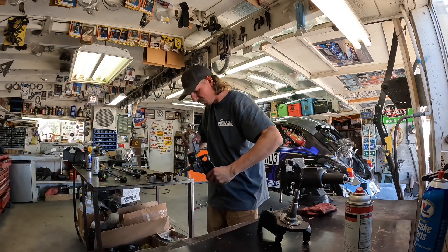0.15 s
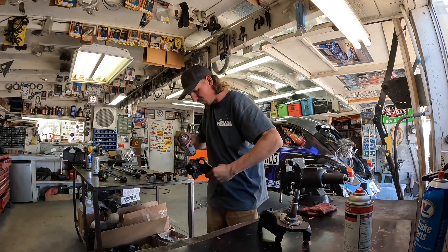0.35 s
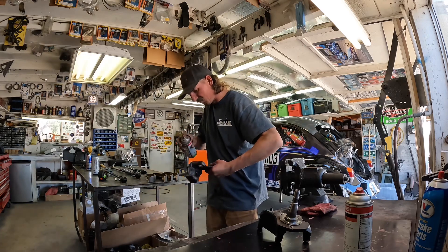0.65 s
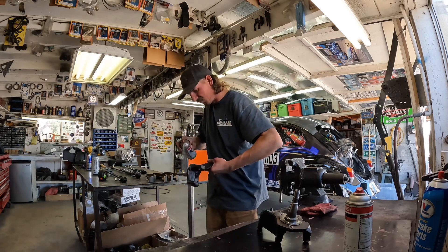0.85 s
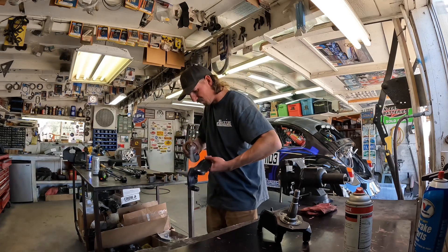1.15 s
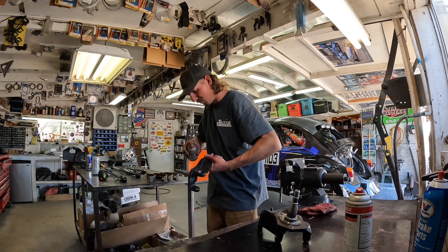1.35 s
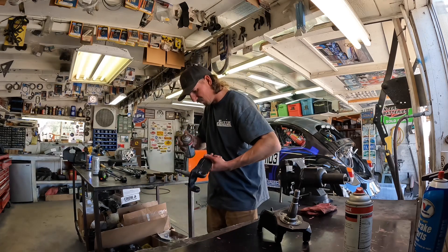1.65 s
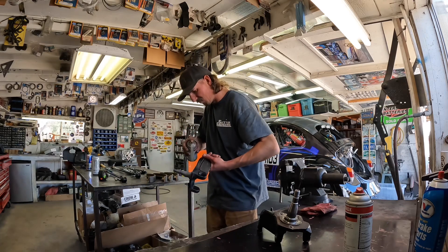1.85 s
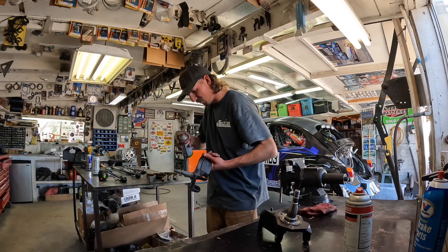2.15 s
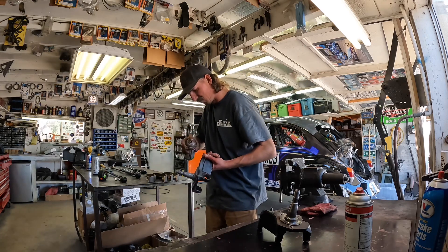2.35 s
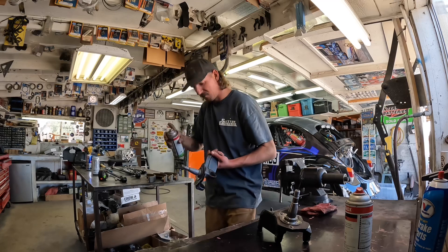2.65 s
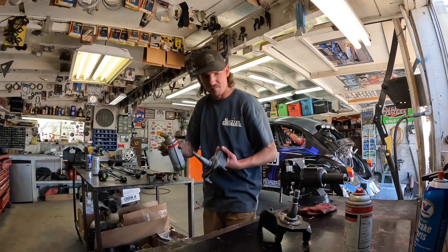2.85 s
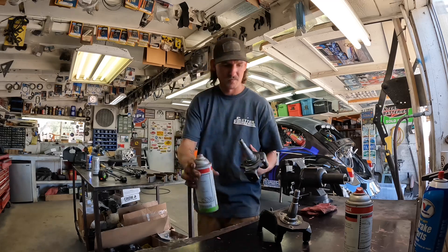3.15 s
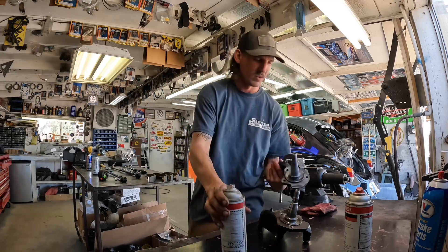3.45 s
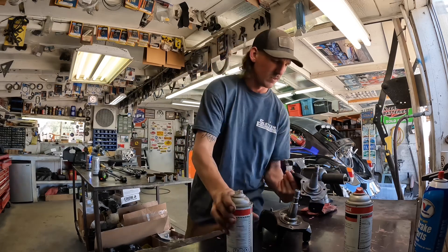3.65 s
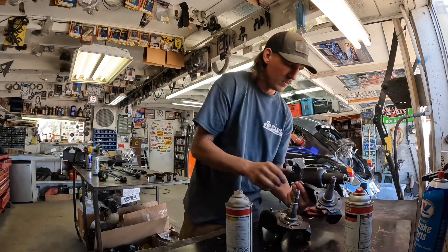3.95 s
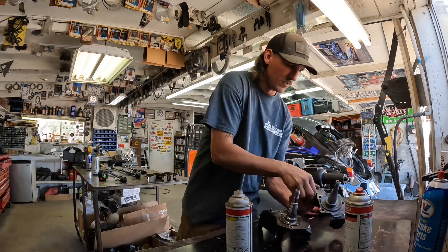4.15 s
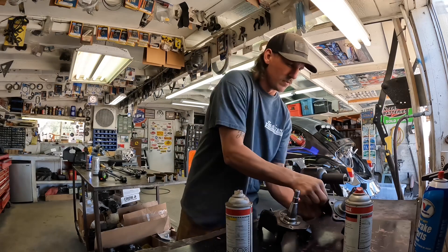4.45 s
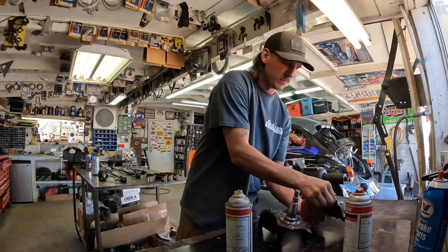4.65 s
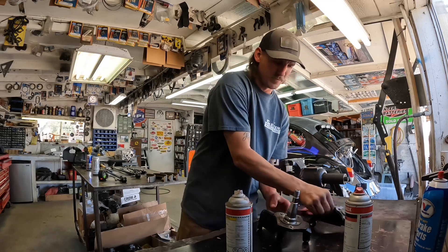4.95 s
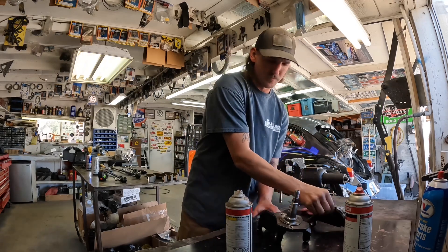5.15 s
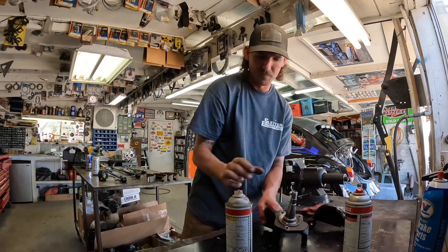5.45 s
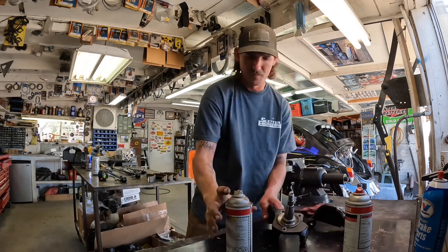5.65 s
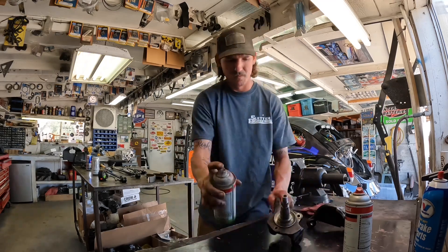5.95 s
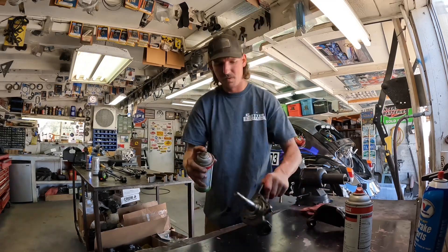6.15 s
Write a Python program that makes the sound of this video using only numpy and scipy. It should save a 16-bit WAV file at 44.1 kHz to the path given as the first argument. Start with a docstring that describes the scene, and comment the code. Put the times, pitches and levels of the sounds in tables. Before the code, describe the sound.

A spray can spurts in brief bursts, pauses with cloth rustle, then cans and steel parts thud and drag across a resonant metal bench.

```python
"""Over the hum of a garage, an aerosol can hisses in short bursts on a metal part, which drips.
The can and steel parts are then knocked down and dragged on the steel bench that carries the microphone.
Hiss, clang and thud are shaped noise; plinks, bench modes, boom, sway and hum are sines.
Cloth rustles at times; a diffuse room tail follows the spray, drips, ticks, knocks and drags."""
import sys
import numpy as np
from scipy import signal
from scipy.fft import rfft, irfft, next_fast_len
from scipy.io import wavfile
from scipy.ndimage import uniform_filter1d

SR = 44100
rng = np.random.default_rng(int(sys.argv[2]) if len(sys.argv) > 2 else 0)


def file_out(sig):
    """Save sig as 16-bit WAV at sys.argv[1]."""
    # one column per channel
    cols = np.atleast_2d(sig).T
    # limit, then scale
    lim = np.clip(cols, -1, 1)
    pcm = np.round(lim * 32767).astype(np.int16)
    wavfile.write(sys.argv[1], SR, pcm)


N = 278271
T = np.arange(N) / SR

# Table levels are relative: layer gains and the port balance come on top.
# aerosol jet spectrum: freq_hz, density_db
JET = [(470, -24), (800, -22.5), (928, -27.5), (1350, -11), (1700, -12.5), (2270, -6.5), (3200, -8.5),
       (4420, -6), (5200, -8.5), (5670, -3.5), (7350, -5), (8640, -9), (11900, -9), (14200, -16.5),
       (15500, -34)]
# scrape and click spectrum of metal on metal: freq_hz, density_db
GRIT = [(800, -4.5), (1400, 9.5), (1750, 9), (2050, 6), (2500, 7), (3500, 3), (4500, -7.5), (7000, -18.5),
        (9000, -35), (14000, -61.5)]
# low spectrum of the struck or juddering bench: freq_hz, density_db
THUD = [(40, -15.5), (65, 3.5), (90, -17), (125, 0), (185, 0), (235, -2), (300, -11.5), (450, -17),
        (900, -73)]
# bench sound at the two ports: freq_hz, left_minus_right_db
BENCH_SIDE = [(30, -5), (130, 0), (600, 1.3), (1200, 1.4), (2500, -2.4), (5000, 0), (12000, 2)]
# source straight ahead: freq_hz, left_minus_right_db
CENTRE = [(20, 0), (16000, 0)]


def amp(db):
    """Decibels to gain."""
    return 10 ** (np.asarray(db) / 20)


def evened(x):
    """Scales to rms 1."""
    return x / np.sqrt(np.mean(x ** 2) + 1e-20)


def read(points, hz):
    """Interpolates a table on a log-frequency axis."""
    f, value = np.transpose(points)
    return np.interp(np.log(hz + 1), np.log(f + 1), value)


def level(s, db):
    """Smoothed gain curve through the points, practically silent outside them."""
    return uniform_filter1d(amp(np.interp(T, s, db, left=-150, right=-150)), 100)


def add(mix, s, sound):
    """Adds a multichannel sound at time s."""
    part = mix[:, max(round(s * SR), 0):][:, :sound.shape[1]]
    part += sound[:, :part.shape[1]]


def colour(x, db_at):
    """Filters by a gain in dB given as a function of frequency."""
    size = x.shape[-1]
    return irfft(rfft(x) * amp(db_at(np.fft.rfftfreq(size, 1 / SR))), size)


def drift(rate_hz):
    """Random curve: straight lines between Gaussian knots of unit variance, rate_hz knots a second."""
    knots = rng.standard_normal(400)
    return np.interp(T * rate_hz, np.arange(len(knots)), knots)


def resonance_db(hz, centre_hz, half_width_hz):
    """Gain of a narrow band, 6 dB down at half_width_hz from its centre."""
    return -20 * np.log10(1 + ((hz - centre_hz) / half_width_hz) ** 2)


def noise(db_at, side, size=N):
    """Coloured noise of rms 1 at two close ports: a shared part plus an opposed part."""
    # likeness of the two ports: freq_hz, correlation
    likeness = [(30, .96), (70, .96), (130, .99), (260, .98), (600, .94), (1200, .88), (2500, .84),
                (5000, .86), (9000, .84), (13000, .42)]
    padded = next_fast_len(size)
    hz = np.fft.rfftfreq(padded, 1 / SR)
    a, b = np.exp(2j * np.pi * rng.random((2, len(hz))))
    same = np.clip(read(likeness, hz), 0, 1)
    lean = amp(read(side, hz) / 2)
    mid, wide = a * np.sqrt(1 + same), b * np.sqrt(1 - same)
    ports = np.array([(mid + wide) * lean, (mid - wide) / lean])
    return evened(irfft(ports * amp(db_at(hz)), padded)[:, :size])


def onset(t):
    """A contact builds its force within about half a millisecond."""
    return 1 - np.exp(-(t / .0004) ** 2)


def gate_db(t, length, rise_db_per_s, fall_db_per_s):
    """Attack, hold and release in dB; the hold runs from t = 0 to length."""
    return rise_db_per_s * np.minimum(t, 0) - fall_db_per_s * np.maximum(t - length, 0)


def spray(flutter_db=1.24, ripple_db=1.5):
    """Sputtering jet hiss, narrower at a light press; an echo off the part combs each press differently."""
    # nozzle presses, light ones only leak: start_s, length_s, hiss_db
    presses = [(0, 0.013, -37), (0.185, 0.12, -40.5), (0.469, 0.13, -40), (0.773, 0.14, -40.5),
               (1.105, 0.12, -39), (1.439, 0.13, -64), (1.474, 0.0072, -56), (1.529, 0.023, -45),
               (1.681, 0.027, -57.5), (1.705, .008, -53), (1.843, 0.034, -61.5), (1.888, 0.14, -39),
               (2.424, 0.11, -39.5)]
    # resonances of nozzle and wetted part: freq_hz, width_hz (Gaussian, 2 sigma), gain_db
    resonances = [(2000, 360, 1.5), (4700, 620, 5), (5600, 420, 3.5), (7500, 1100, 6), (8350, 930, -5),
                  (11300, 1900, 3.5)]
    valve_open_db_per_s, valve_shut_db_per_s = 2000, 804
    build_db, build_s = 4.5, 0.014  # the jet starts this much weaker and builds up
    full_jet_db, leak_hz = -36, 4440
    narrowing_db_per_octave = 0.25  # for each dB below the full jet
    size = 16384
    out = np.zeros((2, N))
    for s, length, db in presses:
        start = max(s - .03, 0)
        t = start + T[:size] - s
        echo_s = rng.uniform(0.000728, 0.0022)
        narrowing = narrowing_db_per_octave * max(full_jet_db - db, 0)

        def shape(hz):
            peaks = sum(g * np.exp(-2 * ((hz - f) / w) ** 2) for f, w, g in resonances)
            comb = ripple_db * np.cos(2 * np.pi * hz * echo_s)
            return read(JET, hz) + peaks + comb - narrowing * abs(np.log2((hz + 1) / leak_hz))

        valve = gate_db(t, length, valve_open_db_per_s, valve_shut_db_per_s)
        build = -build_db * np.exp(-np.maximum(t, 0) / build_s)
        add(out, start, noise(shape, SPRAY_SIDE_OF(), size=size) * amp(db + valve + build))
    return out * amp(flutter_db * drift(60))


def SPRAY_SIDE_OF():
    """The jet's balance between the ports varies with frequency."""
    # spray at the two ports: freq_hz, left_minus_right_db
    jet_side = [(1000, 4.5), (2500, -1), (6000, 1.5), (9000, 2), (13000, 4)]
    return jet_side


def drips(gain_db=-1, t60_s=0.033, splash_db=-11, splash_t60_s=0.022, glide_per_s=4):
    """Each drop is a short sine plink sliding up in pitch, with a little noise splash."""
    # drops: start_s, level_db, start_pitch_hz
    drops = [(1.308, -49, 1490), (1.359, -48, 1440), (1.768, -45.5, 1420), (2.174, -46.5, 1340),
             (4.107, -45.5, 1340), (4.2275, -48, 1306), (4.3035, -47.5, 1270), (4.361, -50, 1310)]
    out, t = np.zeros((2, N)), T[:6000]
    for s, db, hz in drops:
        plink = np.sin(2 * np.pi * hz * (t + glide_per_s * t ** 2 / 2)) * amp(-60 * t / t60_s)
        splash = noise(lambda f: read(JET, f) - f / 900, CENTRE, size=6000)
        splash = splash * amp(splash_db - 60 * t / splash_t60_s)
        add(out, s, amp(db + gain_db) * (plink + splash) * onset(t))
    return out


def ticks(click_t60_s=.045):
    """Small touches of metal on metal: a dry click and one resonance."""
    # touches: start_s, level_db, pitch_hz, t60_s, ring_over_click_db
    touches = [(3.457, -54.5, 3050, 0.082, 5.5), (3.464, -53, 1390, 0.041, 3.5),
               (3.838, -45, 4600, .015, -4), (5.728, -51, 5200, 0.0091, 4), (5.99, -50.5, 1740, 0.5, 4),
               (6.177, -55.5, 2320, .1, -1)]
    out, t = np.zeros((2, N)), T[:8000]
    for s, db, hz, t60, ring_db in touches:
        click = noise(lambda f: read(GRIT, f), CENTRE, size=8000) * amp(-60 * t / click_t60_s)
        ring = np.sin(2 * np.pi * hz * t) * amp(ring_db - 60 * t / t60)
        add(out, s, amp(db) * (click + ring) * onset(t))
    return out


def bench_ring(damped=False):
    """Decaying modes of the bench top, weighted a little differently at each contact."""
    # bench modes: freq_hz, level_db, t60_s (undamped)
    modes = [(292, -5.5, .25), (437.6, -11.5, 0.2), (527, 3.5, 0.24), (558.7, 8, 0.17), (735.3, -6.5, 0.43),
             (728, -6.5, 0.74), (870, -7.5, 0.7), (910, -2, 0.22), (989, 0, 0.36), (1091, 4, 0.15),
             (1437, 1, 0.076), (1544, 3.5, .2), (1695, -4, 0.13), (2265, -2, 0.1), (2250, -8, 0.23),
             (2424, 17, 0.031), (2580, 4, 0.14), (3007, 2.5, 0.14), (3400, 1, 0.14), (3800, -4.5, 0.061),
             (4240, -15, .2), (4300, -7, 0.17), (4870, -11.5, .2), (4930, -11, 0.22), (5570, -6.5, .2),
             (6550, -11.5, 0.2)]
    damped_t60_s, weight_spread_db = .38, 1.8
    t, out = T[:SR], np.zeros((2, SR))
    for hz, db, t60 in modes:
        weight, spread = rng.standard_normal(2)
        port_phase = .3 * min(hz / 1800, 1) * spread * np.array([[1], [-1]])
        phase = 2 * np.pi * rng.random() + port_phase
        lean = amp(read(BENCH_SIDE, hz) * np.array([[.5], [-.5]]))
        decay_s = min(t60, damped_t60_s) if damped else t60
        fade = amp(db + weight_spread_db * weight - 60 * t / decay_s)
        out += lean * fade * np.sin(2 * np.pi * hz * t + phase)
    return out * onset(t) / np.sqrt(np.mean(out[:, :1000] ** 2))


def knocks(ring_db=-2, thud_t60_s=0.27, low_rise_s=0.0025, crack_db=-1, crack_s=0.033):
    """A crack, a clang of dense modes, the ring of the top, a low thud and the boom of the whole sheet."""
    # blows: start_s, clang_db, thud_db, boom_db, brightness_db_per_octave, clang_t60_s, thud_pitch_factor
    blows = [ (3.573, -18, -11, -27, 2, 0.21, 0.99), (3.586, -23, -18, -49.5, -9.5, 0.43, 1.02),
             (3.696, -51.5, -28, -62, 10, 0.18, 1.03), (4.446, -24.5, -8.5, -53, 2, 0.21, 1.065),
             (4.457, -17.5, -12, -51, -3, 0.28, 1.02), (4.595, -48, -16.5, -54, -7, 0.14, 0.82),
             (4.650, -29.5, -16, -54, -5, 0.33, 0.9), (4.792, -52.5, -29.5, -63, -9, 0.062, 1.1),
             (4.9832, -17, -10, -50, -1.5, 0.25, 1.04), (5.088, -20, -12.5, -48.5, 0.5, 0.26, 0.93),
             (5.105, -23.5, -28.5, -54, -7, 0.25, 3), (5.788, -19.5, -24.5, -48, -3.2, 0.13, 1.97),
             (5.953, -33, -23, -71, -4, 0.3, 1.62), (5.965, -44, -28.5, -68, 4.5, 0.41, 0.88),
             (5.992, -44, -50, -60, -1, 0.086, 1), ]
    # dense upper modes: freq_hz, density_db
    dense_modes = [(180, -87), (300, -19), (372, -19.5), (534, -17), (651, -6), (743, -5.5), (862, -11.5),
                   (1100, -6.5), (1930, -6), (2440, -5.5), (4200, -10.5), (4710, -14.5), (10600, -41),
                   (14000, -51.5), (15500, -88.5)]
    # a hand leans on the bench and damps its top: from_s, to_s
    leaning = (4.4, 5.7)
    boom_hz, boom_t60_s = 117, 1.89
    cluster_hz, cluster_db = 90, 3.2
    out, t = np.zeros((2, N)), T[:SR]
    for s, clang_db, thud_db, boom_db, bright_db, t60, pitch in blows:
        clusters = rng.standard_normal(200)  # upper modes bunch unevenly

        def shape(hz):
            bunching = np.interp(hz / cluster_hz, np.arange(200), clusters) * np.clip(hz / 3000, .3, 1)
            tilt = bright_db * np.log2((hz + 200) / 2000)
            return read(dense_modes, hz) + tilt + cluster_db * bunching

        fade = amp(-60 * t / t60) * (1 + amp(crack_db) * np.exp(-t / crack_s))
        clang = noise(shape, BENCH_SIDE, size=SR) * fade
        ring = amp(ring_db) * bench_ring(leaning[0] < s < leaning[1])
        thud = noise(lambda hz: read(THUD, hz / pitch), BENCH_SIDE, size=SR) * amp(-60 * t / thud_t60_s)
        thud = thud / np.sqrt(np.mean(thud[:, :2200] ** 2)) * amp(-8.5)
        boom = np.sin(2 * np.pi * boom_hz * t) * amp(-60 * t / boom_t60_s)
        low = (amp(thud_db) * thud + amp(boom_db) * boom) * (1 - np.exp(-t / low_rise_s))
        add(out, s, (amp(clang_db - 3.5) * (clang + ring) + low) * onset(t))
    return out


def strokes():
    """Gain curves of rub, grit, judder and groan: each stroke grips, grows or fades evenly, and lets go."""
    # dragged metal: start_s, length_s, rub_db, grit_db, judder_db, groan_db, change_along_stroke_db
    pulls = [ (3.652, 0.053, -35.5, -41, -39.5, -60, 8), (4.513, .11, -36, -42.5, -31.5, -54, -3.5),
             (4.649, 0.15, -41.5, -51.5, -36, -59, 1), (5.332, 0.037, -45.5, -49, -61.5, -68, 2),
             (5.45, 0.053, -45.5, -48.5, -58, -54, -1), (5.524, 0.082, -50, -57.5, -49.5, -58, -3.5),
             (5.751, 0.029, -48.5, -45.5, -48, -57, 12), (5.818, 0.13, -39.5, -47, -43, -56, -4),
             (5.947, 0.029, -37, -31, -57, -27.5, -0.5), ]
    grip_db_per_s, let_go_db_per_s = 646.5, 423.5
    out = np.zeros((4, N))
    t = T[:SR // 2] - .1
    for s, length, rub_db, grit_db, judder_db, groan_db, change_db in pulls:
        force_db = gate_db(t, length, grip_db_per_s, let_go_db_per_s)
        force_db = force_db + change_db * (np.clip(t / length, 0, 1) - .5)
        add(out, s + t[0], np.outer(amp([rub_db, grit_db, judder_db, groan_db]), amp(force_db)))
    return out


def drags(rub_db=1, grit_db=0, judder_db=-1, groan_db=-1, ring_share=0.29, uneven_db=0.5):
    """Stick and slip: uneven tiny blows excite the bench under each stroke, and one low resonance groans."""
    # rubbing spectrum: freq_hz, density_db
    rub = [(220, -10), (350, 1), (430, 0), (525, 6), (610, 0), (720, 5), (830, -2.5), (950, 0),
           (1200, -10.5), (1800, -39), (3000, -59)]
    slips_per_s, slip_spread_db, contact_s = 330, 2.5, 0.022
    groan_hz, groan_half_width_hz = 524, 35  # a sliding part chatters on this resonance
    slip_size = amp(slip_spread_db * np.minimum(rng.exponential(1, N), 3))
    slips = (rng.random(N) < slips_per_s / SR) * slip_size * rng.choice([-1, 1], N)
    contact = noise(lambda hz: 0 * hz, BENCH_SIDE, size=2048) * np.exp(-T[:2048] / contact_s)

    def excite(body):
        return evened(signal.oaconvolve(slips[None], body, axes=1)[:, :N])

    dull, ringing = excite(contact), excite(bench_ring(damped=True))

    def tinted(x, points):
        padded = np.pad(x, ((0, 0), (0, next_fast_len(N) - N)))
        return evened(colour(padded, lambda hz: read(points, hz))[:, :N])

    def voice(points, share):
        return np.sqrt(1 - share) * tinted(dull, points) + np.sqrt(share) * tinted(ringing, points)

    groan = noise(lambda hz: resonance_db(hz, groan_hz, groan_half_width_hz), BENCH_SIDE)
    layers = [amp(rub_db) * voice(rub, ring_share), amp(grit_db) * voice(GRIT, ring_share / 4),
              amp(judder_db) * voice(THUD, 0), amp(groan_db) * groan]
    dragged = sum(layer * gain for layer, gain in zip(layers, strokes()))
    return dragged * amp(uneven_db * drift(50))


def sway():
    """Each shove rocks the bench on its legs and shakes the microphone: a wandering low sine."""
    # pushes and blows: start_s, length_s, sway_db
    shoves = [(3.588, 0.12, -21), (3.9, 0.049, -34), (4.456, 0.13, -21.5), (4.682, 0.045, -27.5),
              (4.76, 0.28, -33.5), (5.012, 0.097, -24.5), (5.129, 0.078, -24), (5.388, 0.11, -36.5),
              (5.795, 0.11, -21.5), (5.98, 0.29, -32.5)]
    sway_hz, rise_s, sag_db_per_s = 34.4, 0.016, 13.5
    release_db_per_s = 60 / 0.47  # on top of the sag, once the shove ends
    power = np.zeros(N)
    for s, length, db in shoves:
        t = np.maximum(T - s, 0)
        fade_db = sag_db_per_s * t + release_db_per_s * np.maximum(t - length, 0)
        power += (amp(db - fade_db) * (1 - np.exp(-t / rise_s))) ** 2
    turns = np.cumsum(sway_hz * (1 + .04 * drift(7))) / SR
    return np.sqrt(2 * power) * np.sin(2 * np.pi * turns) * amp([[-3], [2.2]])  # left, right dB


def rustle(brush_db=-2, swish_db=-1, flicker_db=1):
    """Soft, uneven brushing of cloth over a duller swish, both shaped noise."""
    # a shirt brushes: centre_s, half_length_s (to 1/e), level_db
    brushes = [(2.827, 0.04, -69.5), (2.915, .035, -61.5), (3.218, 0.032, -67.5), (3.3, 0.6, -69.5),
               (6.207, 0.15, -66)]
    # cloth spectrum: freq_hz, density_db
    cloth_tint = [(1200, -30), (2600, -6), (4300, 0), (7500, -6), (10000, -17), (14000, -30)]
    # swish level: time_s, level_db
    swish_level = [(2.62, -69.5), (2.942, -58), (3.048, -64.5), (3.258, -65), (3.288, -62), (3.44, -67)]
    # swish spectrum, midrange: freq_hz, density_db
    swish_tint = [(500, -24), (850, -19), (1090, -3), (1400, -6.5), (1860, -1), (2400, -6.5), (3300, -21.5),
                  (6000, -19)]
    brushing = sum(amp(db) * np.exp(-((T - s) / width) ** 2) for s, width, db in brushes)
    cloth = noise(lambda hz: read(cloth_tint, hz), CENTRE) * brushing * amp(brush_db)
    swish = noise(lambda hz: read(swish_tint, hz), CENTRE) * level(*np.transpose(swish_level))
    return (cloth + swish * amp(swish_db)) * amp(flicker_db * drift(25))


def floor(rumble_db=-48.5, fan_db=-78.5, air_db=-69.5, waver_db=1):
    """Wavering hum lines over fan rumble, a narrow band of fan noise and faint hiss."""
    # mains and fan lines: freq_hz, level_db
    lines = [(61.5, -53.5), (120, -62), (135, -57.5), (239.7, -56), (274, -74), (360, -75.5)]
    # rumble spectrum: freq_hz, density_db
    rumble_tint = [(12, -22), (22, 1), (45, 3.5), (75, -3), (100, 1), (145, -2.5), (195, -12), (235, -9),
                   (300, -17.5), (400, -25.5), (465, -32.5), (525, -30), (620, -32), (730, -45),
                   (1100, -43.5), (2500, -92)]
    # hiss spectrum: freq_hz, density_db
    air_tint = [(410, -32.5), (700, -7), (1020, -13), (1180, -9.5), (1370, -5), (1950, -9.5), (3770, -14.5),
                (4850, -6), (5600, -12), (7020, -9), (9330, -17.5), (10600, -8), (15500, -24)]
    fan_hz, fan_half_width_hz = 511.7, 22
    hum = np.zeros(N)
    for hz, db in lines:
        phase = 2 * np.pi * (hz * T + rng.random()) + .2 * drift(1.5)
        hum += amp(db + waver_db * drift(1)) * np.sqrt(2) * np.sin(phase)
    rumble = amp(rumble_db) * noise(lambda hz: read(rumble_tint, hz), CENTRE)
    fan = amp(fan_db) * noise(lambda hz: resonance_db(hz, fan_hz, fan_half_width_hz), CENTRE)
    air = amp(air_db) * noise(lambda hz: read(air_tint, hz), CENTRE)
    return hum + rumble + fan + air


def garage(x, send_db=-1):
    """Diffuse wall reflections; the middle outlasts bass and treble, and bass is alike at both ports."""
    # reverberation: freq_hz, t60_s
    decay = [(100, 0.18), (500, 0.34), (2000, 0.26), (5000, 0.19), (14000, 0.17)]
    apart = [(250, -40), (700, -12), (2000, -6)]  # unlike part of the ports: freq_hz, gain_db
    taps = noise(lambda hz: 0 * hz, CENTRE, size=SR)
    taps = taps + colour(rng.standard_normal((2, SR)), lambda hz: read(apart, hz))
    hz, t, z = signal.stft(taps, SR, nperseg=256)
    fading = z * amp(-60 * t / read(decay, hz)[:, None])
    tail = signal.istft(fading, SR, nperseg=256)[1][:, :SR]
    tail = tail * np.clip(T[:SR] / 0.003 - .3, 0, 1)  # no reflections in the first 0.9 ms
    return amp(send_db) * signal.fftconvolve(x, tail / np.linalg.norm(tail[0]), axes=1)[:, :N]


def scene():
    """The spray is a step away and wetter; the bench is right under the microphone."""
    far = spray() + drips() + ticks()
    near = knocks() + drags()
    room = garage(amp(-5.5) * far + amp(-12.5) * near)
    return far + near + room + sway() + rustle() + floor()


def record(dry):
    """Sound reaches the left port slightly later; peaks are rounded off; then the band limit."""
    # port phase: freq_hz, left_lead_rad
    port_phase = [(100, 0), (300, -.06), (800, -.28), (1500, -.55), (2300, -.72), (4000, -.35),
                  (7000, -.15), (14000, 0)]
    edge_hz = 15450
    size = next_fast_len(N + 1000)
    turn = read(port_phase, np.fft.rfftfreq(size, 1 / SR)) * np.array([[.5], [-.5]])
    ports = irfft(rfft(dry, size) * np.exp(1j * turn), size)[:, :N]
    limited = ports / (1 + (ports / .9) ** 6) ** (1 / 6)
    lowpass = signal.firwin(511, edge_hz, window=("kaiser", 9), fs=SR)
    return signal.oaconvolve(limited, lowpass[None], "same")


dry = scene()
out = record(dry)
file_out(out)
```